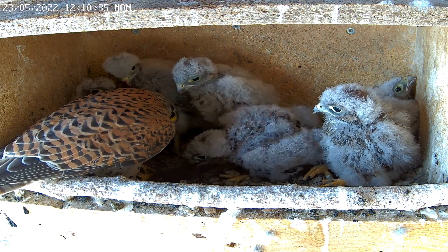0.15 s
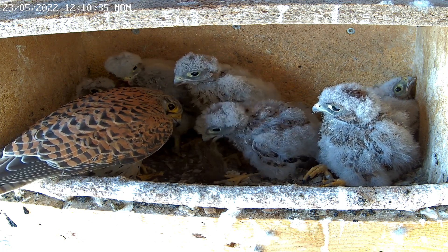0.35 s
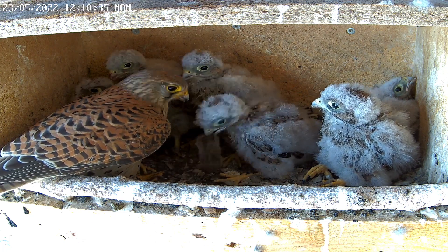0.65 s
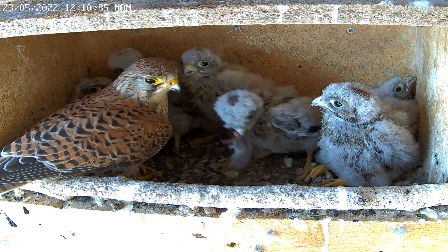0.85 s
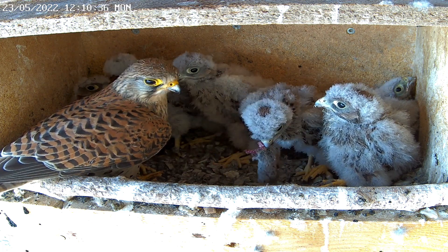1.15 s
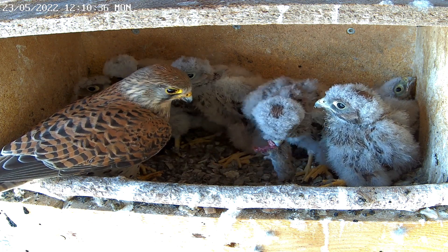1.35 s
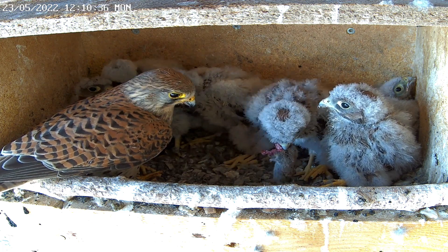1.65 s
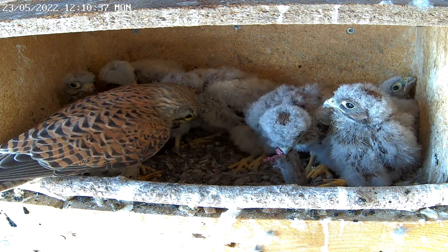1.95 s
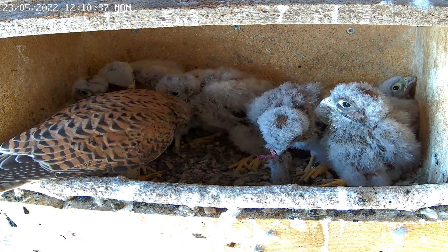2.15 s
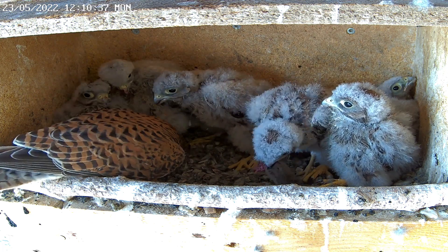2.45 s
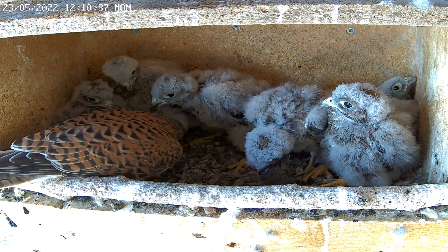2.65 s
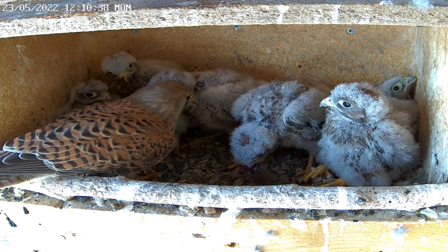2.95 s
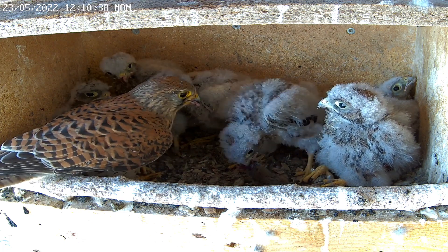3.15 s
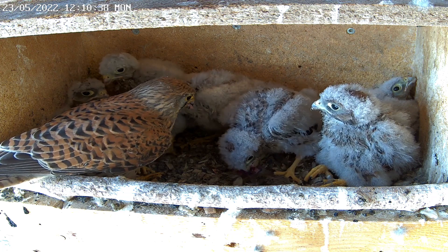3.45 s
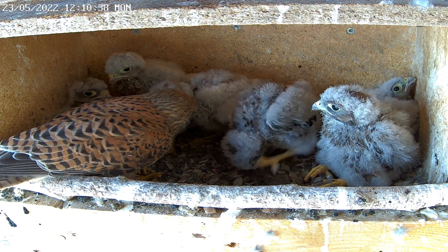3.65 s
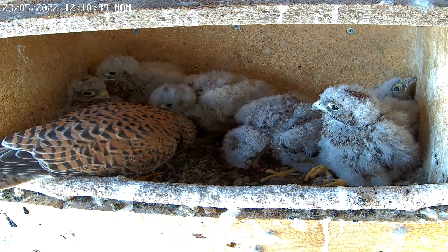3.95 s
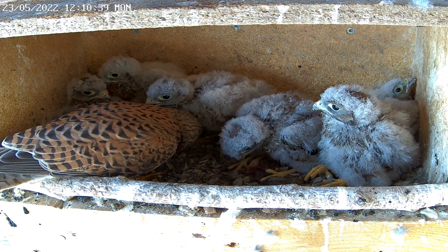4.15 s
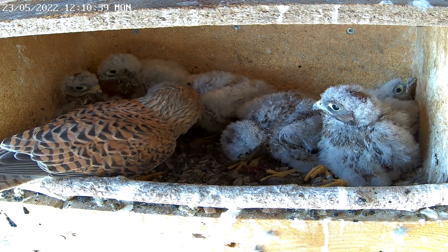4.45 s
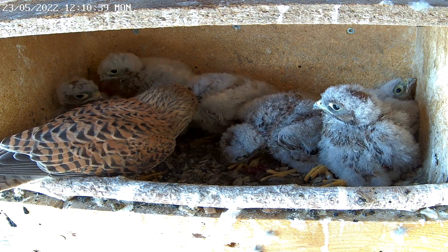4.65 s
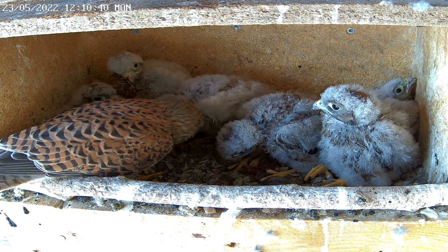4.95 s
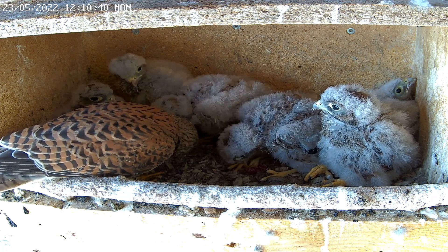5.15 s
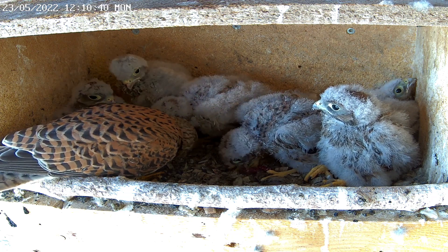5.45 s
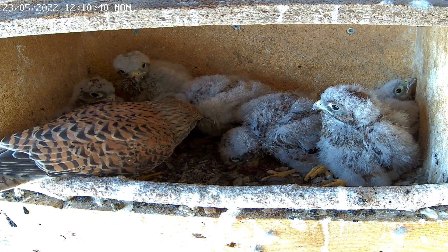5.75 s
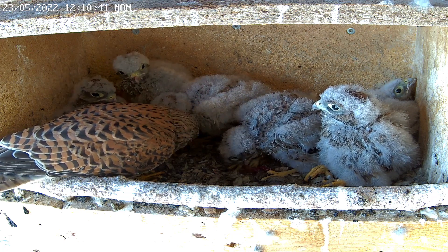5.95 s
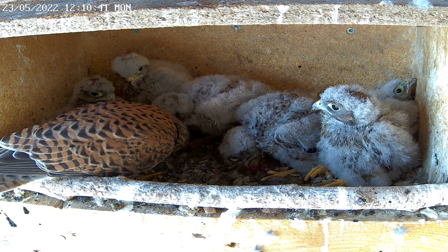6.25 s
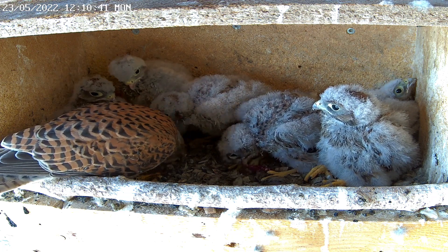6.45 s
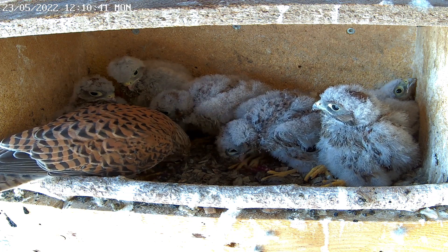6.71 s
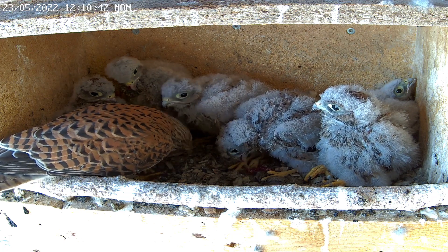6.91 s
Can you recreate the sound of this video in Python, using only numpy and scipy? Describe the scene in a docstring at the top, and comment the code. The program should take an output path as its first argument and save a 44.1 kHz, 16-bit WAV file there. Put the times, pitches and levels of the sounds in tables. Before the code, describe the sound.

Shrill overlapping chick calls crowd a small wooden box for two seconds, then soften into scattered trills, with dull floor thumps and steady electrical hum.

```python
"""Begging kestrel chicks trill, peep and screech over each other in a wooden nest box with a camera inside.
Whistles are bending tones with a faint octave; trills warble about ten times a second, peeps bend once.
Screeches mix grainy noise with wavering tones. Shuffling is shaped noise, and thumps are short low swings.
Beak and claw clicks are brief noise bursts; steady sine hum and noise hiss lie beneath it all."""
import sys
import numpy as np
from scipy import signal
from scipy.fft import rfft, irfft
from scipy.io import wavfile

SR = 44100
rng = np.random.default_rng(int(sys.argv[2]) if len(sys.argv) > 2 else 0)


def to_wav(sig):
    """Store sig (one row per channel, or 1-D mono) as 16-bit WAV at the path in sys.argv[1].

    Samples outside -1..1 are clipped; the rate is SR.
    """
    pcm = np.clip(np.atleast_2d(sig), -1, 1) * 32767
    pcm = np.round(pcm).astype(np.int16)
    wavfile.write(sys.argv[1], SR, pcm.T)  # frames by channels


N = 312228
TIME = np.arange(N) / SR  # seconds

# Mains hum. Each row: pitch in Hz, rms level in dB.
HUM_TONES = [(50, -42.5), (100, -51.5), (150, -71.5), (200, -64)]
# Tone colour of the microphone hiss. Each row: frequency in Hz, relative level in dB.
HISS_SPECTRUM = [(150, 13), (330, 17), (400, 9.5), (480, 6), (620, 3.5), (1100, -5), (1700, 1), (3100, 3),
                 (4000, -5), (5500, -6), (7000, -9.5), (8000, -16), (9500, -23.5), (11500, -46)]
# Tone colour of the floor's rumble. Each row: frequency in Hz, relative level in dB.
RUMBLE_SPECTRUM = [(5, -27.5), (14, 4), (25, 8.5), (38, -8), (70, -2.5), (95, -14.5), (140, -32),
                   (600, -79)]
# Tone colour of scuffing on the boards. Each row: frequency in Hz, relative level in dB.
SCUFF_SPECTRUM = [(50, -19), (100, 5.5), (135, 3), (200, -5), (300, -9.5), (390, -19.5), (680, -26.5),
                  (1300, -26), (3000, -56), (10000, -83)]
# The boards' own resonances. Each row: frequency in Hz, width in Hz, level in dB relative to the scuffing noise.
BOARD_MODES = [(467.5, 59, -24.5), (910, 420, -28.5), (1085, 100, -29)]
# The brood's restless stirring between moves. Each row: time in seconds, floor rumble in dB,
# scuffing in dB before its overall level.
STIRRING_LEVELS = [(0, -45, -43.5), (3.0, -42, -44), (5.4, -45.5, -48), (7.08, -48, -47.5)]
# A bird shifts its weight. Each row: time of the height of the move in seconds, half length in seconds,
# floor rumble in dB, scuffing in dB before its overall level.
WEIGHT_SHIFTS = [(1.257, 0.3, -34.5, -39), (1.507, 0.079, -33, -33), (1.8, 0.17, -31.5, -37.5),
                 (2.223, 0.083, -30.5, -39.5), (2.63, 0.19, -34, -45.5), (3.557, 0.098, -43, -45.5),
                 (3.885, 0.087, -35.5, -47.5), (4.198, 0.093, -32.5, -43.5), (4.85, 0.08, -41, -50.5),
                 (5.758, 0.086, -39.5, -71), (6.967, 0.1, -32, -43)]
# Footfalls and tugs at the prey. Each row: start in seconds, height of the swell in dB, pitch in Hz.
FLOOR_THUMPS = [(1.361, -25.5, 57), (1.496, -33, 156), (1.765, -27, 68), (1.946, -21.5, 66),
                (2.01, -21, 25.8), (2.424, -23.5, 25.2), (2.689, -30, 21.8), (3.548, -38, 170),
                (3.607, -26.5, 120), (3.658, -34, 130), (3.746, -30.5, 121), (3.822, -27, 64.7),
                (3.86, -30, 133), (4.136, -27.5, 40), (6.866, -22.5, 39.3), (6.895, -27, 120),
                (7.043, -23, 55)]
# Small knocks and clicks of beak and claw. Each row: start in seconds, peak in dB before the box's ring,
# pitch in Hz.
BEAK_CLAW_TICKS = [(1.195, -59, 6500), (1.51, -48, 693), (1.707, -51, 6360), (6.225, -56, 950),
                   (6.698, -57, 1630)]
# How box and camera housing pass the whistles, strongest near 1.7 kHz. Each row: frequency in Hz, gain in dB.
HOUSING_RESPONSE = [(900, -40), (1400, -14), (1560, -7), (1640, -4), (1725, -0.5), (1790, -3.5),
                    (1860, -11), (2050, -11.5), (2500, -13), (3000, -10), (3420, -11), (4000, -14),
                    (4600, -28.5), (5600, -27), (8000, -50.5)]
# Hard begging breaks into a screech. Each row: start in seconds, length in seconds, lower resonance opening
# and closing in dB, upper resonance opening and closing in dB, all before the mix settings in screech().
SCREECH_CALLS = [(0.0, 0.48, -56.5, -74, -52.5, -51), (0.361, 0.32, -61.5, -55.5, -43.5, -47.5),
                 (0.68, 0.88, -55, -56.5, -58, -57), (0.811, 0.51, -57.5, -41.5, -42, -42.5),
                 (1.522, 0.437, -46, -43.5, -43, -53.5), (2.15, 0.3, -41, -62, -48, -63.5),
                 (3.967, 0.35, -67, -68, -68, -68), (4.604, 0.45, -74, -68, -69, -72),
                 (5.358, 0.2, -76, -78, -69, -68), (5.9, 0.235, -76, -78, -69, -63)]
# Tone colours of the screech's lower and upper resonance and its overtone band.
# Each row: frequency in Hz, relative level in dB.
LOWER_RASP = [(1000, -49.5), (1450, -17.0), (1620, -3), (1780, -3.5), (2000, -6.5), (2400, -5.5),
              (2900, -29.0), (4500, -51.5)]
UPPER_RASP = [(1500, -53), (2400, -10.5), (2900, -6.5), (3350, -6.5), (3900, -14), (4400, -15.5),
              (4900, -33.5), (7500, -55)]
OVERTONE_BAND = [(3000, -40.0), (4700, -5.5), (5350, -1), (5900, -16), (10000, -36.5), (14000, -57.0)]
# How the voice changes with pitch. Each row: pitch in Hz, pitch jitter as a share at full hoarseness,
# jitter speed in Hz, strength shimmer as a share at full hoarseness,
# octave level in dB before the changes with effort and pitch.
VOICE_REGISTERS = [(2180, 0.058, 354, 1.5, -3.5), (2500, 0.042, 260, 1, -16.5),
                   (3500, 0.075, 400, 0.88, -26.5)]
# Short calls of a single bend. Each row: start in seconds, length in seconds, opening, middle and closing
# pitch in Hz, opening, middle and closing level in dB before the overall level and housing, hoarseness 0 to 1.
PEEP_CALLS = [(0.0, 0.039, 1820, 1570, 1550, -27.5, -37.5, -37.5, 0),
              (0.065, 0.049, 2090, 1606, 1700.0, -29, -39, -35, 0.4),
              (0.15, 0.043, 1840, 1620, 1780, -61, -50, -53, 0.42),
              (0.241, 0.032, 1650.0, 1885, 2110.0, -61, -32, -72, 0.22),
              (0.243, 0.12, 3560, 4010, 3120, -25.5, -30.0, -26, 0.22),
              (0.354, 0.096, 3650.0, 4150, 4200, -37, -27, -38, 0.4),
              (0.401, 0.073, 3160, 3314, 3310, -44.5, -20, -35, 0.22),
              (0.45, 0.09, 3660.0, 4170, 3830, -25, -37, -35, 0.25),
              (0.497, 0.063, 2590, 2470.0, 2500.0, -38.0, -30.5, -43.0, 0.2),
              (0.708, 0.03, 1550.0, 1720.0, 1950.0, -51, -47, -47, 0.15),
              (0.808, 0.019, 1550, 1797, 1970.0, -33, -28.5, -19, 0.05),
              (0.976, 0.065, 3425, 3630, 3310, -26.0, -20, -20, 0.2),
              (1.033, 0.042, 2470, 2040, 2340, -44, -33, -56, 0.1),
              (1.061, 0.078, 3400.0, 3755, 3220, -31, -16.5, -23.5, 0.14),
              (1.13, 0.041, 2140, 2355, 2460.0, -32, -23.5, -28.5, 0.17),
              (1.3, 0.036, 2860, 2160.0, 1360.0, -40, -24.0, -34.0, 0.4),
              (1.488, 0.019, 1620.0, 1657, 1820, -21.5, -22.5, -32, 0.17),
              (1.489, 0.073, 3130.0, 4070, 3760, -22, -25.5, -31, 0.18),
              (1.509, 0.094, 1844, 1960.0, 1438, -22, -22, -30.5, 0.2),
              (1.545, 0.036, 3357, 3170.0, 3240.0, -29, -25, -24, 0.25),
              (1.577, 0.091, 3220.0, 3670, 2310, -28, -22.5, -39, 0.2),
              (1.664, 0.08, 3130, 3537, 3270, -44, -18, -28, 0.05),
              (1.758, 0.074, 3255, 3445, 3350, -27, -14.5, -28, 0),
              (1.83, 0.022, 2180.0, 2015, 1960.0, -22, -24.5, -27, 0.2),
              (1.853, 0.092, 3440.0, 3650, 3095, -32.5, -17, -31.5, 0.14),
              (1.919, 0.028, 2480.0, 2220, 1450, -25.0, -20.5, -22.5, 0.23),
              (2.118, 0.028, 1468, 1694, 1790, -24.5, -27, -32, 0.33),
              (2.232, 0.067, 3190, 3430, 3060, -33, -21, -29.5, 0.05),
              (2.343, 0.047, 3320.0, 3360, 3100, -38.5, -30, -43.0, 0),
              (2.518, 0.038, 2600, 2520, 2340, -51, -39, -43, 0.14),
              (4.807, 0.096, 2110, 2050, 2130.0, -49, -52, -60, 0.1),
              (5.302, 0.031, 2810, 3080, 3200.0, -52.0, -48, -55.0, 0.4),
              (5.385, 0.06, 3560, 3740, 3340.0, -47, -36.5, -42, 0.05),
              (5.5, 0.06, 3600, 3670, 3490.0, -46, -35, -43.5, 0),
              (5.609, 0.035, 3630.0, 3630.0, 3530, -60.5, -46.5, -55.0, 0.03),
              (5.897, 0.05, 2850.0, 3140, 2990, -37, -36, -47, 0.04),
              (6.205, 0.036, 3410.0, 3490, 3350.0, -66.5, -52, -65.0, 0.1),
              (6.557, 0.069, 3360, 3365, 3260, -46, -36.5, -54, 0.1),
              (6.617, 0.14, 2200.0, 2300.0, 2440, -56.0, -53, -46.0, 0.47),
              (6.68, 0.04, 3250, 3400.0, 3290.0, -64.5, -53, -68.0, 0.04)]
# Warbling calls. Each row: start in seconds, length in seconds, opening and closing centre pitch in Hz,
# final drop in Hz (negative rises), warbles per second, warble depth in Hz, delay of the first crest in seconds,
# opening, middle and closing level in dB before the overall level and housing,
# accent on the troughs in dB, hoarseness 0 to 1 before the accents change it.
TRILL_CALLS = [(0.061, 0.2, 3410, 3730, -4, 11.6, 428, 0.076, -35.5, -38, -28.5, -2, 0.49),
               (0.263, 0.46, 2820, 2676, 211, 9.13, 142, 0.043, -45, -36.5, -42, -5, 0.23),
               (0.268, 0.412, 2094, 2224, 853, 9.2, 50.0, 0.037, -48, -45, -30.5, 1.5, 0.26),
               (0.438, 0.24, 3985, 3993, 331, 10.4, 435, 0.082, -28, -23, -26, -2, 0.14),
               (0.48, 0.185, 3040, 2990.0, 229, 7.31, 240.0, 0.15, -35.5, -47, -37, 6, 0.38),
               (0.683, 0.32, 1958, 1910, 382.5, 11.3, 98, 0.086, -38.5, -37.5, -35, 1, 0.22),
               (0.719, 0.265, 3110, 3700, 0.0, 10.6, 220.0, 0.024, -23, -25.5, -20.5, 0.0, 0.26),
               (1.153, 0.17, 3476, 3716, 650.0, 12.0, 131, 0.043, -25, -17, -21.5, -1, 0.04),
               (1.282, 0.22, 1820.0, 1770.0, 3, 10.4, 163, 0.08, -32, -32, -27.5, 3, 0.04),
               (1.364, 0.25, 2790.0, 2974, 4, 9, 110.0, 0.052, -39, -31, -33, 0.5, 0.47),
               (1.5, 0.18, 1853, 2003, 2.5, 12.4, 149, 0.034, -25.0, -31.5, -27.5, 0.5, 0.23),
               (1.686, 0.24, 2078, 2203, 0.0, 10.6, 170.0, 0.01, -37.0, -29, -32, 3.5, 0.08),
               (1.968, 0.17, 1930, 1740, -4, 9.6, 152, 0.063, -37.5, -36, -33, 5, 0.11),
               (2.122, 0.12, 3490, 3940, 4, 12, 200.0, 0.038, -27.5, -30, -42, 4, 0.33),
               (2.134, 0.28, 1726, 2460.0, 850.0, 10.0, 126, 0.027, -25, -33.0, -35.5, 0.0, 0.1),
               (2.556, 0.21, 2014, 1864, 323, 10, 89, 0.049, -51.0, -44, -41, 1.5, 0.06),
               (3.138, 0.28, 3110.0, 3170.0, 0.0, 6.4, 130.0, 0.011, -50.5, -53.5, -57, 5, 0.3),
               (3.145, 0.51, 1972, 1778, 220.0, 11.5, 171, 0.084, -57, -41, -39, 2.0, 0.09),
               (3.429, 0.36, 3200, 3010, 949, 9.95, 185.0, 0.0069, -44.0, -45.5, -48, 6.0, 0.2),
               (3.941, 0.23, 1860, 1793, 140.0, 9.05, 160.0, 0.056, -70, -42, -42, 6, 0.1),
               (3.967, 0.34, 2920, 2744, 453, 8.7, 200.0, 0.027, -50, -39, -41, -3, 0.13),
               (4.004, 0.295, 2490.0, 2410, 254, 8.87, 170.0, 0.102, -47, -37, -36.5, 1.5, 0.2),
               (4.515, 0.44, 2265, 2604, 2, 10.0, 83.5, 0.064, -40, -37, -33.5, 0, 0.12),
               (4.525, 0.42, 2630.0, 2730, 3, 9.8, 160.0, 0.05, -42.5, -43, -44, -1, 0.4),
               (4.641, 0.44, 3640.0, 3680, 0.0, 10.18, 90.0, 0.05, -58, -67, -51.5, -6, 0.2),
               (4.926, 0.27, 1888, 1820, 142, 9, 160.0, 0.095, -46.5, -42, -46, 4, 0.09),
               (4.951, 0.18, 2860, 2520, 429, 10.8, 130.0, 0.042, -49, -41.5, -48, -9.5, 0.23),
               (5.305, 0.39, 2530, 2535, 382, 9.5, 130.0, 0.001, -48.5, -44, -43.5, -3.5, 0.14),
               (5.919, 0.33, 2490, 2453, 200.0, 9.3, 109, 0.089, -48, -44.5, -43.5, 1.5, 0.16),
               (5.999, 0.13, 3300.0, 3370, 100.0, 10.4, 70.0, 0.025, -39.5, -43, -41.5, -3.5, 0.06),
               (6.482, 0.13, 2264, 2340, 0.0, 10.0, 40.0, 0.028, -43.0, -42.5, -48, 2.5, 0.17),
               (6.599, 0.26, 2306, 2200.0, 250.0, 9.1, 190.0, 0.098, -44.5, -45, -42.0, -1, 0.23),
               (6.77, 0.3, 2510, 2730, -1, 6.2, 30.0, 0.042, -48.5, -43, -25.5, -6, 0.25)]


def undb(db):
    """Decibels to gain."""
    return 10 ** (np.asarray(db) / 20)


def unit(x):
    """Scale to an rms of one."""
    return x / np.sqrt(np.mean(x ** 2))


def curves(table):
    """The columns of a timed table, joined by straight lines."""
    s, *columns = np.transpose(table)
    return [np.interp(TIME, s, column) for column in columns]


def colour(x, points):
    """Filter to a given spectrum without sound ahead of its cause, so that attacks stay sharp."""
    size = 8192
    hz, db = np.transpose(points)
    bins = np.maximum(np.arange(size // 2 + 1) * SR / size, 1)
    gain = undb(np.interp(np.log(bins), np.log(hz), db))
    # folding the cepstrum forward makes the filter minimum phase
    cepstrum = irfft(np.log(gain))
    cepstrum[1:size // 2] *= 2
    cepstrum[size // 2 + 1:] = 0
    impulse = irfft(np.exp(rfft(cepstrum)))
    return signal.fftconvolve(x, impulse)[:len(x)]


def noise(points):
    """Noise with a given spectrum and an rms of one."""
    white = rng.standard_normal(N + SR // 10)
    return unit(colour(white, points)[-N:])


def flutter(hz, count):
    """Random wavering, mostly slower than hz, with an rms of one."""
    low_pass = signal.butter(4, hz, fs=SR, output="sos")
    white = rng.standard_normal(count + SR // 10)
    return unit(signal.sosfilt(low_pass, white)[-count:])


def resonate(x, hz, width_hz):
    """One resonance, gain one at its centre."""
    return signal.lfilter(*signal.iirpeak(hz, hz / width_hz, fs=SR), x)


def electronics(hiss_db=-60):
    """Steady mains hum from sine tones, and microphone hiss from shaped noise."""
    hum = np.zeros(N)
    for hz, db in HUM_TONES:
        # the root of two turns rms into peak height
        hum += undb(db) * np.sqrt(2) * np.sin(2 * np.pi * (hz * TIME + rng.random()))
    return hum + undb(hiss_db) * noise(HISS_SPECTRUM)


def movement():
    """Gain of rumble and scuffing: each move swells and ebbs over the stirring."""
    rumble, scuff = undb(curves(STIRRING_LEVELS))
    for s, half_length, rumble_db, scuff_db in WEIGHT_SHIFTS:
        swell = np.exp(-((TIME - s) / half_length) ** 2 / 2)
        rumble = np.hypot(rumble, undb(rumble_db) * swell)
        scuff = np.hypot(scuff, undb(scuff_db) * swell)
    return rumble, scuff


def thumps(swing_cycles=1.16):
    """Each footfall or tug swings the floor for a cycle or two, rising fast and dying away."""
    out = np.zeros(N)
    for s, db, hz in FLOOR_THUMPS:
        cycles = np.maximum(TIME - s, 0) * hz
        age = 2 * cycles / swing_cycles
        out += undb(db) * age * np.exp(1 - age) * np.sin(2 * np.pi * cycles)
    return out


def boards(scuff_level_db=-2.0):
    """Feet and bodies load the floor, scuff its resonances and thump it."""
    rumble, scuff = movement()
    scuffing = noise(SCUFF_SPECTRUM)
    for hz, width_hz, db in BOARD_MODES:
        ring = resonate(rng.standard_normal(N), hz, width_hz)
        scuffing += undb(db) * unit(resonate(ring, hz, width_hz))
    return rumble * noise(RUMBLE_SPECTRUM) + scuff * undb(scuff_level_db) * scuffing + thumps()


def ticks(decay_s=0.0013):
    """Beak and claw clicks: fast-fading noise bursts through a broad resonance."""
    out = np.zeros(N)
    t = TIME[:SR // 20]
    for s, db, hz in BEAK_CLAW_TICKS:
        burst = rng.standard_normal(len(t)) * np.exp(-t / decay_s)
        click = resonate(burst, hz, hz / 2)
        out[int(s * SR) + np.arange(len(t))] += undb(db) * click / abs(click).max()
    return out


def box(x, wet_db=-16):
    """Close wooden walls add a very short ring, made of fading noise."""
    t60 = .08  # seconds to fade by 60 dB
    t = TIME[:SR // 8]
    tail = rng.standard_normal(len(t)) * np.exp(-np.log(1000) * t / t60)
    return x + undb(wet_db) * signal.fftconvolve(x, tail / np.linalg.norm(tail))[:N]


def screech_strengths(attack_s=0.032, release_s=0.016):
    """Gain of both screech resonances: a fast opening, an even swell or fade in dB, then a quick end."""
    lower, upper = np.zeros(N), np.zeros(N)
    for s, length, lower_from_db, lower_to_db, upper_from_db, upper_to_db in SCREECH_CALLS:
        t = TIME - s
        gate = np.clip(t / attack_s, 0, 1) * np.exp(-np.maximum(t - length, 0) / release_s)
        lower_db = np.interp(t, [0, length], [lower_from_db, lower_to_db])
        upper_db = np.interp(t, [0, length], [upper_from_db, upper_to_db])
        lower = np.hypot(lower, gate * undb(lower_db))
        upper = np.hypot(upper, gate * undb(upper_db))
    return lower, upper


def strands(hz, spread, count, wander_hz=35, jitter=.012, flicker_db=6):
    """Unstable tones that wander about a resonance, each flickering in loudness by itself."""
    out = np.zeros(N)
    for _ in range(count):
        pitch = hz * (1 + spread * flutter(wander_hz, N) + jitter * flutter(300, N))
        flicker = undb(flicker_db * np.tanh(flutter(70, N)))
        out += flicker * np.sin(2 * np.pi * np.cumsum(pitch) / SR)
    return unit(out)


def screech(lower_db=-6, upper_db=-7, lower_tones_db=-6, upper_tones_db=-6, overtone_db=-18, grain_db=2):
    """Chaotic vibration in two resonances of throat and box: wavering tones in a grainy rasp."""
    lower, upper = screech_strengths()
    low = undb(lower_db + grain_db * flutter(240, N)) * noise(LOWER_RASP)
    low += undb(lower_tones_db) * strands(1850, spread=0.11, count=2)
    high = undb(upper_db + grain_db * flutter(270, N)) * noise(UPPER_RASP)
    high += undb(upper_tones_db) * strands(3250, spread=0.05, count=3)
    # a faint overtone band swells with the lower resonance
    overtone = undb(overtone_db) * noise(OVERTONE_BAND)
    return lower * (low + overtone) + upper * high


def span(s, length):
    """The samples of a call and the seconds since it began."""
    n = np.arange(max(int(s * SR), 0), min(int((s + length) * SR), N))
    return n, (n - n[0]) / SR


def arch(t, opening, middle, closing):
    """One smooth bend through the opening, middle and closing values of a call."""
    u = t / t[-1]
    return opening + (closing - opening) * u + (2 * middle - opening - closing) * 2 * u * (1 - u)


def whistle(t, hz, db, hoarse, edge_s=0.0032, tremor=0.0057, tremble_db=2, attack_db=3):
    """One whistle of the syrinx, a bird's voice organ; hoarseness shakes its pitch and strength."""
    register_hz, *traits = np.transpose(VOICE_REGISTERS)
    jitter, jitter_hz, shimmer, octave_db = (np.interp(hz.mean(), register_hz, trait) for trait in traits)
    hoarse = np.clip(hoarse, 0, 1)
    shake = jitter * hoarse * flutter(jitter_hz, len(t))
    pitch = hz * (1 + shake + tremor * flutter(74, len(t)))
    phase = 2 * np.pi * np.cumsum(pitch) / SR
    gate = np.clip(np.minimum(t, t[-1] - t) / edge_s, 0, 1)
    # the clearest notes tremble less in strength
    effort_db = db + tremble_db * np.minimum(hoarse / 0.022, 1) * flutter(60, len(t))
    # a call opens with a brief push of air
    effort_db += attack_db * np.exp(-t / 0.01)
    strength = gate * undb(effort_db) * (1 + shimmer * hoarse * flutter(260, len(t)))
    # the octave comes out when the whistle is pushed hard, and hardly on the lowest notes
    pitch_db = np.interp(pitch, [1900, 2150, 2400], [-13, -2, 4])
    octave = undb(octave_db + 0.77 * (effort_db + 21.5) + pitch_db)
    return strength * (np.sin(phase) + octave * np.sin(2 * phase))


def peeps(level_db=-1.0):
    """Short whistles whose pitch and loudness each make a single bend."""
    out = np.zeros(N)
    for s, length, from_hz, mid_hz, to_hz, from_db, mid_db, to_db, hoarse in PEEP_CALLS:
        n, t = span(s, length)
        hz = arch(t, from_hz, mid_hz, to_hz)
        out[n] += whistle(t, hz, arch(t, from_db, mid_db, to_db), hoarse)
    return undb(level_db) * out


def trills(level_db=-0.5, unsteady_db=2, unsteady_hz=25):
    """Whistles whose pitch swings about a sliding centre; loudness and clearness swing with it."""
    arching = 0.08  # crests are rounder than troughs
    drop_s = 0.0093  # how fast the pitch collapses as a trill runs out of air
    accent_clears = 0.45  # dB of hoarseness lost for each dB of extra push
    out = np.zeros(N)
    for (s, length, from_hz, to_hz, drop_hz, rate, depth_hz, crest_s,
         from_db, mid_db, to_db, accent_db, hoarse) in TRILL_CALLS:
        n, t = span(s, length)
        turn = 2 * np.pi * rate * (t - crest_s)
        swing = np.cos(turn) - arching * np.cos(2 * turn)
        centre_hz = from_hz + (to_hz - from_hz) * t / length
        hz = centre_hz + depth_hz * swing - drop_hz * np.exp((t - length) / drop_s)
        push_db = -accent_db * swing + unsteady_db * flutter(unsteady_hz, len(t))
        loudness_db = arch(t, from_db, mid_db, to_db) + push_db
        out[n] += whistle(t, hz, loudness_db, hoarse * undb(-accent_clears * push_db))
    return undb(level_db) * out


def chicks():
    """Begging whistles, flaring as they sweep through the housing's resonance, and their screech."""
    return colour(trills() + peeps(), HOUSING_RESPONSE) + screech()


def scene():
    """Everything inside the nest box, on one channel."""
    return (electronics() + boards() + box(ticks() + chicks()))[None]


def record(dry, image_db=-44):
    """The camera's slow converter mirrors the sound faintly into the top octave; the very top is cut."""
    converter_hz, top_hz = 16000, 13200
    mirrored = 2 * dry * np.cos(2 * np.pi * converter_hz * TIME)
    low_pass = signal.ellip(10, .2, 80, top_hz, fs=SR, output="sos")
    fade_out = np.minimum((TIME[-1] - TIME) / .004, 1)  # over the last 4 ms
    return fade_out * signal.sosfilt(low_pass, dry + undb(image_db) * mirrored)


dry = scene()
out = record(dry)
to_wav(out)
```